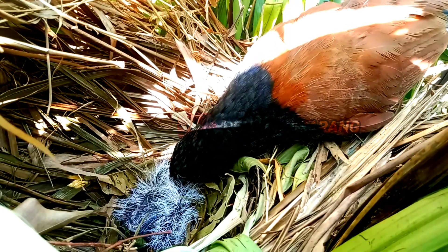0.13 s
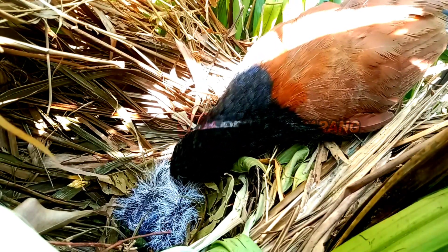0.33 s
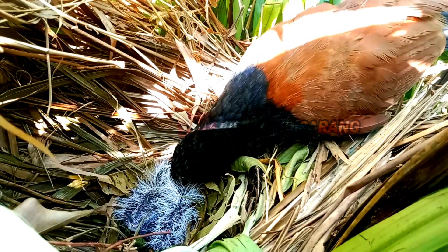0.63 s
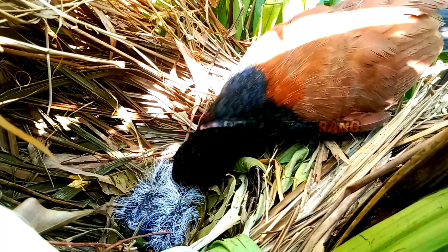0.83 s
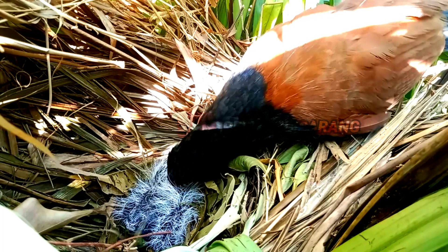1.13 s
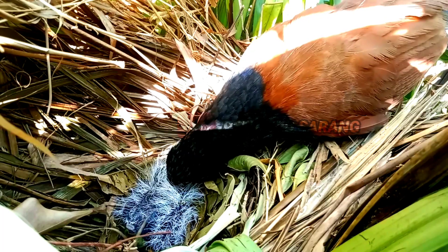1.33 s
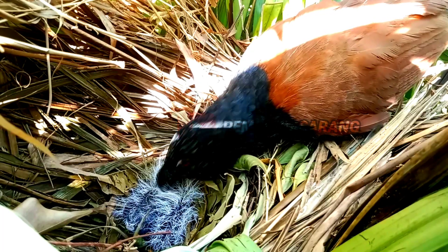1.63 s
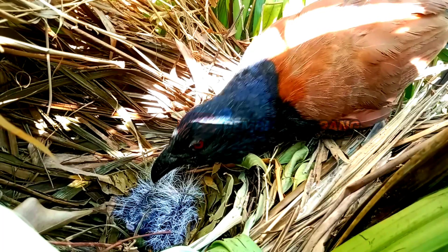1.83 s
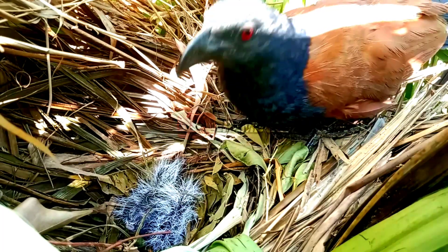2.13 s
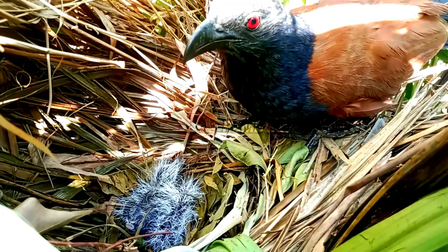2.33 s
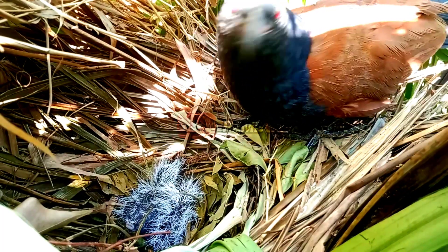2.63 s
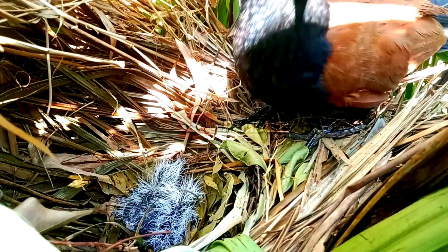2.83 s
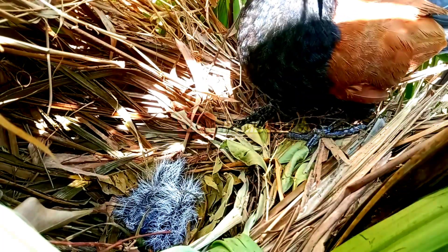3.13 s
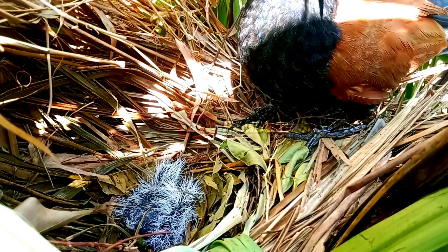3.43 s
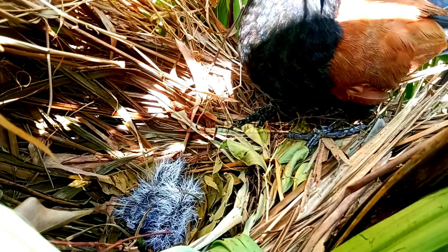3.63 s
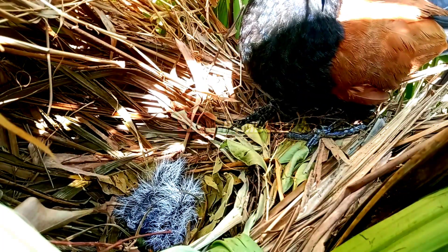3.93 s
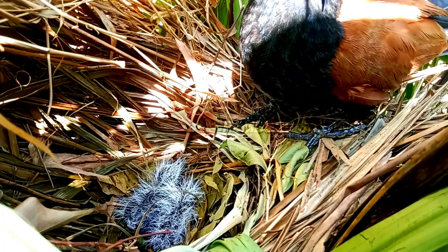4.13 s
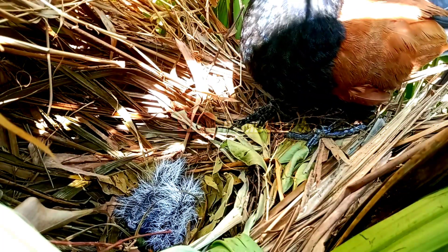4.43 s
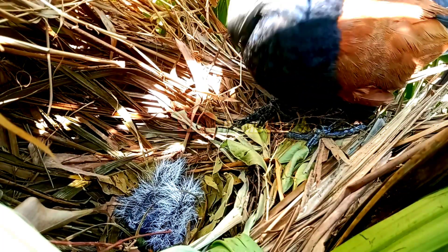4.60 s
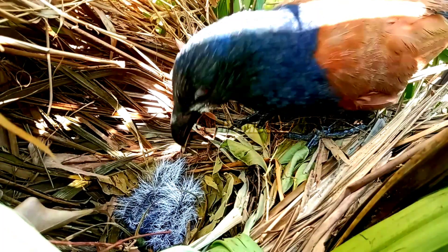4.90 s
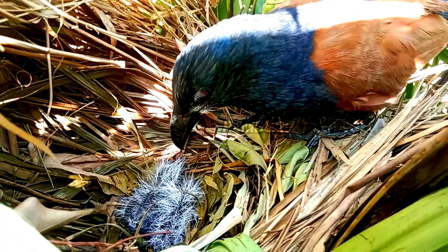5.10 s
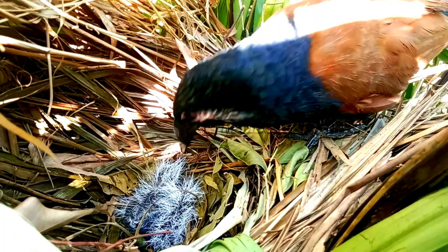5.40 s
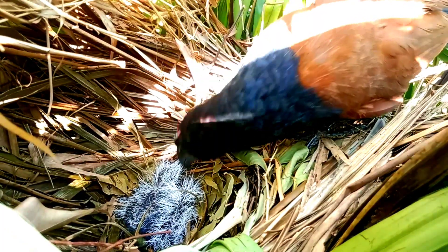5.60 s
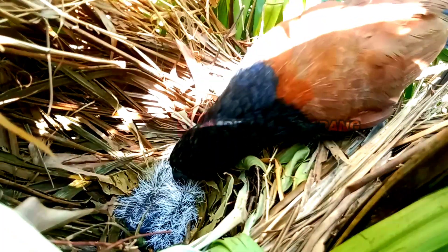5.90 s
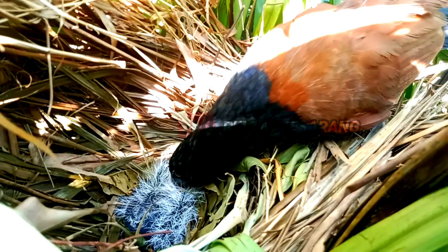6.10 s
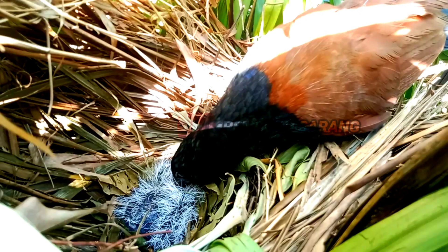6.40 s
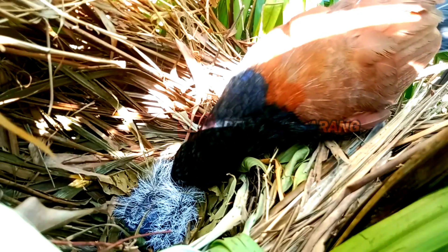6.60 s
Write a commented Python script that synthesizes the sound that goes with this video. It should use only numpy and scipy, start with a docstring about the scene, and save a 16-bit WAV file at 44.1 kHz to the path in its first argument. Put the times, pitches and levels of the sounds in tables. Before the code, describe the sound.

Close up, a baby bird gives three faint calls, then hoarse, hissing begging calls, evenly spaced and fading away.

```python
"""Coucal chick begging in the nest

Close up in dry leaves, a chick gives three faint calls, then a run of loud rasping hisses that fades.
Each call is turbulent air ringing throat and open beak, over a thin voice that arches in pitch.
Narrow peaks and dips colour the calls and the parent's lowered head shades them. Insects trill behind,
faint far whistles come and go, and a low hum swells under the first loud call."""
import sys
import numpy as np
from scipy import signal
from scipy.fft import rfft, irfft
from scipy.io import wavfile

SR = 44100
rng = np.random.default_rng(int(sys.argv[2]) if len(sys.argv) > 2 else 0)


def store_pcm(level_fs):
    """Save levels as 16-bit WAV."""
    pcm = np.round(np.clip(level_fs, -1, 1) * 32767).astype(np.int16)
    wavfile.write(sys.argv[1], SR, np.atleast_2d(pcm).T)


N = 297675
T = np.arange(N) / SR
FREQ = np.maximum(np.arange(N // 2 + 1) * SR / N, 1)


def amp(db):
    """Decibels to gain."""
    return 10 ** (np.asarray(db) / 20)


def unit(x):
    """Scale to rms 1."""
    return x / np.sqrt(np.mean(x ** 2))


def noise():
    """White noise."""
    return rng.standard_normal(N)


def shape(x, gain):
    """Filter by a gain at each frequency; rms 1."""
    return unit(irfft(rfft(x) * gain, N))


def colour(points):
    """EQ curve through (freq_hz, level_db) points."""
    hz, db = np.transpose(points)
    return amp(np.interp(np.log(FREQ), np.log(hz), db))


def resonance(hz, width):
    """Gain of a resonance applied twice."""
    return 1 / (1 + ((FREQ ** 2 - hz ** 2) / (FREQ * width)) ** 2)


def below(hz, order=4):
    """Gain of a low-pass."""
    return 1 / np.sqrt(1 + (FREQ / hz) ** (2 * order))


def wander(rate_hz):
    """Random drift up to about the given rate; rms 1."""
    return shape(noise(), below(rate_hz, order=2))


def cycles(hz):
    """Running phase in radians."""
    return 2 * np.pi * np.cumsum(hz) / SR


def glides(rows, scatter, fifth=0):
    """Gliding tones that swell and fade, with an optional partial a fifth above."""
    out = np.zeros(N)
    waver = 1 + scatter * wander(90)
    for start_s, length_s, start_hz, end_hz, db in rows:
        now = (T > start_s) & (T < start_s + length_s)
        progress = (T[now] - start_s) / length_s
        phase = cycles((start_hz + (end_hz - start_hz) * progress) * waver[now])
        swell = amp(db) * np.sqrt(2) * np.sin(np.pi * progress)
        out[now] += swell * (np.sin(phase) + fifth * np.sin(1.5 * phase))
    return out


def background():
    """A bed of quiet outdoor rumble and the thin high hiss of the undergrowth."""
    # rumble spectrum: freq_hz, level_db
    air = [(18, -53), (30, -9.5), (91, -6), (161, -23), (178, -21), (435, -29), (626, -22), (693, -26),
           (1350, -29.5), (3800, -29), (4940, -73), (8360, -120)]
    # undergrowth hiss spectrum: freq_hz, level_db
    shimmer = [(3000, -28), (4000, -3.5), (7000, -4.5), (8300, 0), (9100, 5.5), (9500, 0), (10400, 6),
               (11400, -7.5), (15500, -5.5)]
    rumble_eq = colour(air) * below(3600) * (1 - below(45, order=2))
    rumble = amp(-79 + wander(2.7)) * shape(noise(), rumble_eq)
    return rumble + amp(-77.5 + .6 * wander(5.8)) * shape(noise(), colour(shimmer))


def insects():
    """Each chirp is three wing strokes, the last one weak; each stroke sags in pitch."""
    # one row an insect: chirps_per_s, offset_s, pitch_hz, level_db
    trills = [(20.95, 0.041, 4620, -64.5), (19.38, 0.019, 4580, -75.5)]
    out = 0
    for rate, offset_s, hz, db in trills:
        chirp = np.cumsum(rate * (1 + .0063 * wander(3.2))) / SR - offset_s * rate
        stroke = 3 * chirp % 1
        pulses = np.where(chirp % 1 < 2 / 3, 1, .3) * np.sin(np.pi * stroke) ** 2
        tone = np.sin(cycles(hz + 320 * (.5 - stroke) + 28 * wander(100)))
        out += amp(db) * unit(tone * pulses * amp(1.64 * wander(18)))
    return thicket(out, echo_db=-10, echo_t60=.08, tail_db=-13, tail_t60=.3)


def thicket(x, echo_db, echo_t60, tail_db, tail_t60):
    """Stems close by throw back quick echoes; the thicket adds a faint short tail."""
    twigs = noise() * (rng.random(N) < .03) * amp(-60 * T / echo_t60) * (T > .001)
    tail = noise() * amp(-60 * T / tail_t60) * (T > .008)
    response = amp(echo_db) * twigs / np.linalg.norm(twigs) + amp(tail_db) * tail / np.linalg.norm(tail)
    return x + signal.fftconvolve(x, response[:SR // 2])[:N]


def whistles():
    """Thin far whistles and chirps, almost pure tones."""
    # far notes: start_s, length_s, start_hz, end_hz, level_db
    notes = [(0.1, .85, 2270, 2170, -83.5), (0.86, 0.061, 3900, 3350, -81), (1.465, 0.033, 3820, 3320, -74),
             (3.25, 0.53, 780, 785, -65.5), (5.7, 0.21, 2386, 2370, -79), (6.1, 0.2, 2360, 2387, -75.5)]
    return glides(notes, scatter=.0011)


def hum():
    """A low, slightly uneven hum with a weak octave comes in swells."""
    # hum swells: start_s, length_s, fade_s, pitch_hz, level_db
    swells = [(0.494, 1.8, 0.26, 100.2, -79.5), (1.537, 0.3, 0.07, 100.2, -41),
              (1.75, 0.049, 0.02, 98, -34.5), (2.03, 0.34, 0.072, 85, -62.5),
              (2.605, 0.14, 0.061, 122, -50)]
    out, waver = 0, 1 + .0053 * wander(25)
    for start_s, length_s, fade_s, hz, db in swells:
        swell = np.clip(np.minimum(T - start_s, start_s + length_s - T) / fade_s, 0, 1) ** 2
        phase = cycles(hz * waver)
        out += amp(db) * swell * unit(np.sin(phase) + amp(-23.5) * np.sin(2 * phase))
    return out * amp(2.7 * wander(35))


def push(age, length_s, release_s, sag_db_per_s, attack_s=.02, hold_s=.082):
    """Air pressure in dB through one push: it swells out of silence, holds, sags and lets go."""
    edges = np.exp(-age / attack_s) + np.exp((age - length_s) / release_s)
    return -50.5 * edges - sag_db_per_s * np.maximum(age - hold_s, 0)


def voicing(age, on_s, off_s, edge_s=.011, trace_db=-16):
    """Gate in dB for the lowest partial: open in the heart of a push, a trace outside it."""
    sounding = (np.tanh((age - on_s) / edge_s + 1) - np.tanh((age - off_s) / edge_s - 1)) / 2
    return trace_db * (1 - sounding)


def begging():
    """Pushes of air drive the envelopes of hiss, sizzle, croak and voice, the pitch and the overtones."""
    # One row a push; the first two loud calls take two each. Later times count from the push's start.
    # start_s, length_s, release_s, sag_db_per_s, hiss_db, sizzle_db, croak_db, voice_db (all pre-mix),
    # voice_on_s, voice_off_s, top_hz, rise_s, fall_s, overtone_db
    pushes = [ (0.537, 0.2, 0.015, 38.5, -83, -84, -65.5, -70, 0.048, 0.083, 702, 0.072, 0.074, -8.5),
              (0.905, .288, 0.023, 88, -64, -64.5, -59.5, -77, 0.041, 0.14, 711, 0.064, 0.061, -5),
              (1.225, 0.3, 0.026, 62, -65.5, -67, -64.5, -90, .05, .15, 695.5, .08, 0.11, -8),
              (1.544, 0.28, 0.022, 26.5, -23, -20.5, -42, -40.5, 0.048, 0.15, 895, .06, 0.087, -3),
              (1.708, 0.24, 0.023, -8, -22, -25.5, -42, -47.5, 0.06, .18, 819, 0.15, .08, -5),
              (2.018, 0.32, 0.0094, 49.5, -19, -19, -41, -35.5, 0.046, 0.22, 992, .085, .14, -4),
              (2.245, .207, 0.014, 44.5, -21, -17, -47, -36.5, 0.045, 0.1, 925.4, 0.078, 0.11, 0.5),
              (2.522, 0.26, 0.017, 42, -21, -16, -38, -37, 0.082, 0.2, 963, .085, 0.12, -7),
              (2.83, .240, 0.037, -2, -23.5, -18.5, -43.5, -37.5, 0.11, 0.11, 861, 0.068, 0.13, -1),
              (3.151, 0.25, 0.031, -6.5, -24, -21.5, -42, -40, 0.088, 0.19, 908.5, 0.058, .135, 0),
              (3.476, 0.25, 0.042, -5.5, -25, -23, -37.5, -42.5, .03, 0.2, 895, 0.062, 0.081, -6.5),
              (3.809, 0.27, 0.053, -1, -25.5, -25, -37, -42, .045, .18, 853.4, 0.086, .06, -8),
              (4.163, 0.29, 0.036, 48.5, -28, -28, -38, -44.5, 0.02, 0.191, 892, .08, .065, -7.5),
              (4.508, .290, 0.032, 49, -27.5, -28, -37, -43.5, 0.055, 0.17, 817, 0.064, 0.064, -9),
              (4.875, 0.27, .012, 125, -26.5, -27, -36.5, -42, .04, 0.17, 861, 0.083, 0.051, -7),
              (5.232, 0.3, 0.043, 64.5, -32.5, -31, -41, -44, .025, .19, 871, .085, .072, -6.5),
              (5.598, 0.26, 0.022, 124, -39, -39, -46, -51.5, 0.032, 0.12, 767, 0.082, .079, -7.5),
              (5.954, 0.28, .017, 135, -43, -50.5, -50.5, -53, .035, 0.087, 695, 0.14, 0.11, -6.5),
              (6.292, 0.27, 0.028, 63.5, -50.5, -55, -49, -59.5, 0.097, 0.21, 802, .075, 0.098, -6)]
    start_hz, rest_hz = 637, 687.8
    power, syrinx, weight = np.zeros((4, N)), np.zeros((2, N)), np.zeros(N)
    for (start_s, length_s, release_s, sag, hiss_db, sizzle_db, croak_db, voice_db,
         on_s, off_s, top_hz, rise_s, fall_s, overtone_db) in pushes:
        now = (T > start_s) & (T < start_s + length_s)
        age = T[now] - start_s
        effort_db = push(age, length_s, release_s, sag)
        falling = age > rise_s
        from_top = np.abs(age - rise_s) / np.where(falling, fall_s, rise_s)
        drop = np.minimum(from_top, 1) ** np.where(falling, 1.7, 2)  # 0 atop the arch, 1 at its feet
        hz = top_hz + drop * (np.where(falling, rest_hz, start_hz) - top_hz)
        croak = croak_db + .87 * effort_db
        voice = voice_db + .9 * effort_db + .5 * drop + voicing(age, on_s, off_s)
        power[:, now] += amp([hiss_db + effort_db, sizzle_db + effort_db, croak, voice]) ** 2
        # overtones clear as the pitch falls and sink as the push weakens
        clarity_db = overtone_db + 3.5 * drop * falling + .2 * effort_db
        lead = amp(effort_db) ** 2  # where pushes overlap, the stronger leads
        syrinx[:, now] += lead * np.array([hz, clarity_db])
        weight[now] += lead
    hz, overtone_db = syrinx / np.where(weight > 0, weight, 1)
    return (*np.sqrt(power), np.where(weight > 0, hz, rest_hz), overtone_db)


def vocal_tract(source, edges_hz):
    """Throat and beak ring with the source; the sound is split at the edges into bands of rms 1."""
    # throat and beak resonances: centre_hz, width_hz, level_db
    formants = [(740, 97, -21.5), (1245, 67, -20), (1502, 560, -22), (2330, 507, -11.5), (2685, 670, -13.5),
                (3190, 470, -17), (3730, 1700, -8), (4630, 270, -1), (5350, 810, 0.5), (6200, 470, -1),
                (6830, 430, 2.5), (7355, 310, 4.5), (7890, 380, 6.5), (8635, 200, 3.5), (8845, 950, 4),
                (9700, 920, -9.5), (10290, 2500, 0.5), (11400, 570, -5.5), (12120, 880, 2.5),
                (12800, 1400, -23), (13620, 1000, -24), (15150, 693, -21.5)]
    gain = np.sqrt(sum((amp(db) * resonance(hz, width)) ** 2 for hz, width, db in formants))
    under = [0] + [below(hz, order=11) for hz in edges_hz] + [1]
    return [shape(source, gain * upper * (1 - lower)) for lower, upper in zip(under, under[1:])]


def chick():
    """Air rushes past the buzzing syrinx and rings throat and beak, over a hoarse voice and a flutter."""
    hiss, sizzle, croak, voice, pitch_hz, overtone_db = begging()
    scatter = .015 * 2 ** (-overtone_db / 5.5)  # pitch jitter doubles as the overtones sink 5.5 dB
    phase = cycles(pitch_hz * (1 + scatter * wander(233)))
    # overtones 2 to 11 each break up on their own and sink into the turbulence towards the treble
    levels_db = [1.5, 0, 1, -5, -8, -10, -10, -10, -11, -13]
    buzz = sum(amp(db + 2.5 * wander(18)) * np.sin(k * phase) for k, db in enumerate(levels_db, 2))
    # the air is chopped once a cycle and sputters irregularly
    air = unit(noise() * (1 + .3 * np.cos(phase)) * amp(.6 * wander(350)))
    source = air + .5 * amp(overtone_db) * unit(buzz)
    gullet, throat, mouth, beak = vocal_tract(source, edges_hz=(2500, 4400, 8200))
    rasp = np.sqrt(hiss * croak)  # the throat lies between gullet and mouth, and so does its level
    cry = (amp(-.5) * croak * gullet + amp(-1) * rasp * throat
           + amp(-.6) * hiss * mouth + amp(-4) * sizzle * beak)
    # the more the pitch scatters, the hoarser the lowest partial
    hoarse = 21 * scatter
    fraying = wander(100) * np.sin(phase) + wander(100) * np.cos(phase)
    fundamental = (np.sqrt(2) * np.sin(phase) + hoarse * fraying) / np.hypot(1, hoarse)
    return cry + amp(-4) * voice * fundamental + flutter(hiss)


def flutter(hiss):
    """A low flutter rides the hiss envelope of each call."""
    eq = colour([(25, -19), (50, -2), (75, -3), (135, 1.5), (175, -4.5), (205, -2), (260, -13.5),
                 (340, -16), (500, -8.5), (900, -36.5)])
    return amp(-45) * hiss ** .66 * shape(noise(), eq)


def nest(calls):
    """Peaks and dips colour the calls, the parent's lowered head shades them and the stems echo them."""
    # narrow peaks and dips, with a slightly duller top near 14 kHz: centre_hz, width_hz, gain_db
    ripples = [(4325, 220, -9), (5130, 130, -8), (6000, 150, -8), (6590, 110, -8), (6751, 60, 4),
               (7011, 60, 4), (7205, 50, 5), (7794, 70, 3), (7983, 50, 4), (8379, 45, 5), (8560, 90, -3),
               (8691, 50, 4), (8979, 60, 4), (9172, 50, 4), (9630, 160, -4), (10157, 80, 3), (10470, 90, 2),
               (10921, 80, 3), (11560, 250, -5), (12129, 45, 4), (13100, 250, 4), (14100, 900, -5)]
    # tone under the parent's head: freq_hz, gain_db
    shade = [(2000, -1.5), (4700, 0.5), (5500, 1), (6200, 1), (7200, 0), (7900, -7), (8600, -2),
             (9600, -11), (10600, 6.5), (11500, -9), (13000, -4), (15000, 4)]
    # the head moving over the chick: time_s, shaded_share
    stoop = [(0, 0.52), (1.7, 0.96), (2.2, 0.73), (2.3, 0.051), (2.6, 0.26), (3.2, 0.052), (4.7, 0.021),
             (5.3, 0.12), (5.8, 0.31), (6.4, 0.74)]
    ripple_db = sum(db * resonance(hz, width) for hz, width, db in ripples)
    coloured = irfft(rfft(calls) * amp(ripple_db), N)
    shaded = irfft(rfft(coloured) * colour(shade), N)
    share = np.clip(np.interp(T, *np.transpose(stoop)), 0, 1)
    blend = (1 - share) * coloured + share * shaded
    return thicket(blend, echo_db=-11, echo_t60=.02, tail_db=-41.5, tail_t60=.097)


def squeaks():
    """The second side of the syrinx adds short sliding squeaks."""
    # squeaks: start_s, length_s, start_hz, end_hz, level_db
    notes = [(0.547, 0.12, 1440, 1240, -65.5), (2.554, 0.063, 1523, 1240, -44),
             (2.86, 0.17, 1820, 1480, -47.5), (3.182, 0.07, 1500, 1230, -40.5),
             (3.51, 0.075, 1348, 1154, -49.5), (3.839, 0.075, 1260, 1204, -47),
             (4.22, 0.0806, 1407, 1230, -50.5), (4.69, 0.076, 467.7, 545, -55.5),
             (5.98, 0.074, 1203, 1374, -52.5)]
    return glides(notes, scatter=.014)


def squawks(length_s=.06, start_hz=1320, end_hz=1790):
    """Most later calls catch with a quick upward squawk."""
    # catches in the voice: start_s, level_db
    catches = [(3.165, -51), (3.495, -51), (3.832, -51), (4.182, -49), (4.525, -47), (4.89, -45),
               (5.248, -51), (5.62, -52.5), (6.318, -55)]
    notes = [(start_s, length_s, start_hz, end_hz, db) for start_s, db in catches]
    return glides(notes, scatter=.014, fifth=1.4)


def scene():
    """The chick up front and the ambience behind, alike in both channels."""
    calls = chick() + squeaks() + squawks()
    mono = nest(calls) + insects() + hum() + whistles() + background()
    return np.array([mono, mono])


def record(dry):
    """A brick-wall low-pass cuts the top at 15.5 kHz."""
    return irfft(rfft(dry) * below(15500, order=150), N)


dry = scene()
out = record(dry)
store_pcm(out)
```